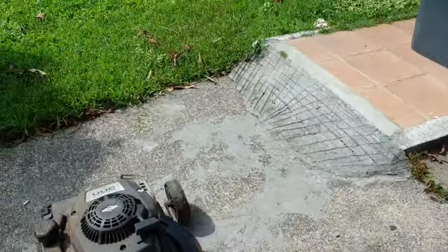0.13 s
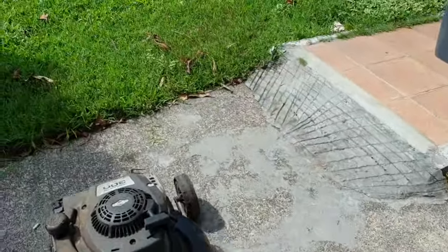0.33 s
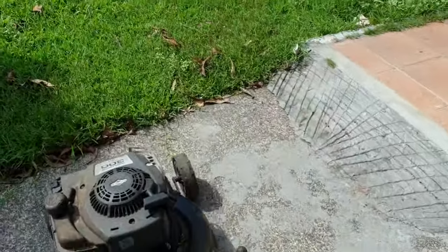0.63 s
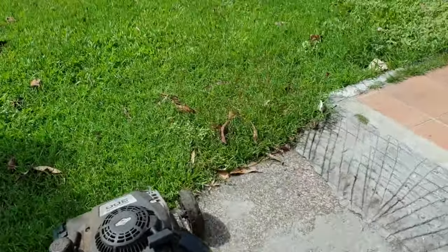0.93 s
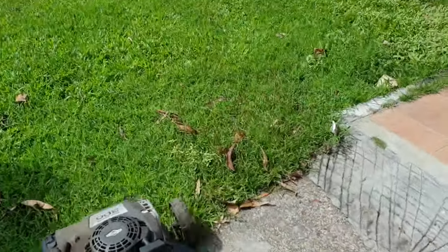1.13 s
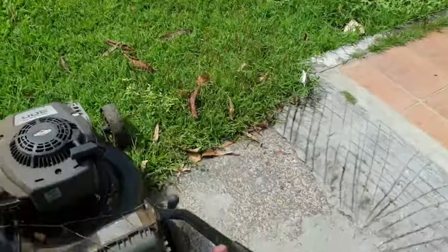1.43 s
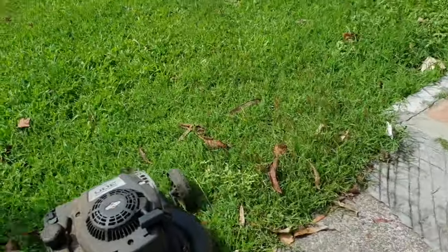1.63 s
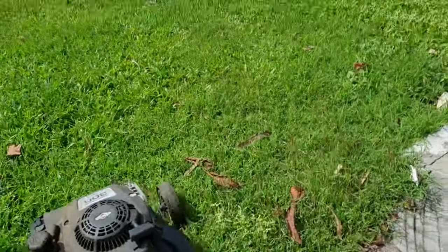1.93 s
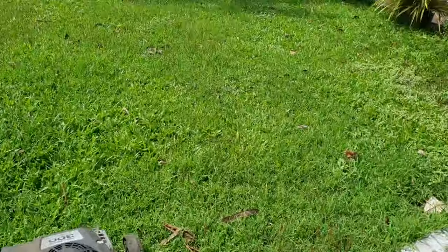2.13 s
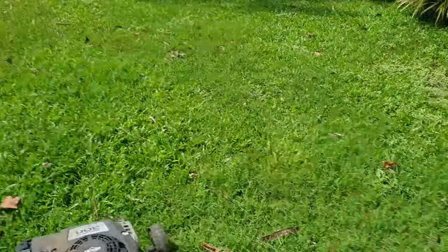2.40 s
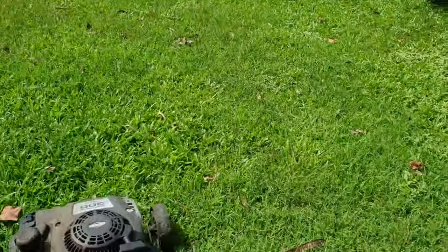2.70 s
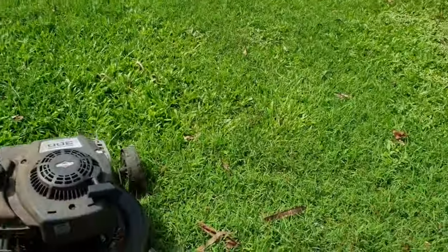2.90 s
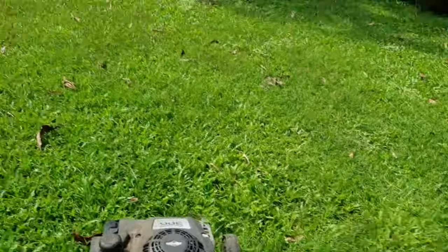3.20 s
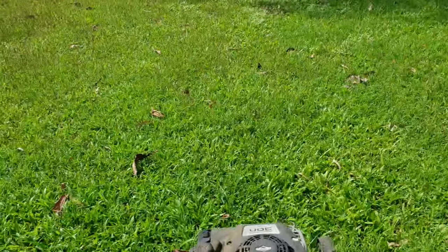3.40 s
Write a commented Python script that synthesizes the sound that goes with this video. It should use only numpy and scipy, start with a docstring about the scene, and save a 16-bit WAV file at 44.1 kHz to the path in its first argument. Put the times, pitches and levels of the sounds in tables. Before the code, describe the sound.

A switched-off lawn mower rattles loudly over rough concrete, then rolls quietly onto grass

```python
"""A rattling steel rumble opens: a switched-off walk-behind mower is pushed over rough concrete, then onto a lawn.
Hard wheels drive the resonances of the steel deck with random bumps; grit scrapes and loose steel buzzes.
Single jolts boom and knock in the deck, loose parts crack, ring and ping, and bumps thud in the ground.
Grass brushes the deck as flickering filtered noise and dry bits snap; two ports hear it in stereo.
The loudest peaks saturate."""
import sys
import numpy as np
from scipy.fft import rfft, irfft, next_fast_len
from scipy.io import wavfile
from scipy.ndimage import map_coordinates

SR = 44100
rng = np.random.default_rng(int(sys.argv[2]) if len(sys.argv) > 2 else 0)


def unload_audio(sound):
    """Save the sound as a 16-bit wav file, at the path given as the first command line argument."""
    columns = np.transpose(np.atleast_2d(sound))
    # keep every value between -1 and 1, then stretch to whole-number steps
    steps = np.round(np.clip(columns, -1, 1) * 32767)
    wavfile.write(sys.argv[1], SR, steps.astype(np.int16))


N = 156555  # samples

# Resonances of the steel deck: f/Hz, width/Hz, level/dB
DECK_MODES = [(237.4, 41.5, 2.5), (297.6, 26.5, 2), (333, 61.7, -4), (481, 165, -9.5), (647, 68.4, -7),
              (778, 59, -12), (919, 35, -14), (1256, 84, -22)]
# Resonances of the ground: f/Hz, width/Hz, level/dB
GROUND_MODES = [(56, 64, -5.5), (93, 52.4, -2)]
# Resonances of the loose steel: f/Hz, width/Hz, level/dB
LOOSE_MODES = [(2032, 88, 8.5), (3360, 120, -6)]
# Relative spectrum of a sharp crack: f/Hz, density/dB per Hz
CRACK_SPECTRUM = [(900, -12.5), (2500, -13), (3680, -7.5), (5340, -3), (7740, -6.5), (10000, 2),
                  (15800, -5.5)]

BUMP_HZ = 1430  # corner above which the push of a bump on the deck weakens
GRIT_SPREAD_DB = 4  # unevenness of grit impacts
DETUNE = 0.02  # relative random shift of resonances from blow to blow


def amp(db):
    """Convert a level in dB to an amplitude ratio."""
    return 10 ** (np.asarray(db) / 20)


def unit(x):
    """Normalise a signal to an rms of 1."""
    return x / np.sqrt(np.mean(x ** 2) + 1e-20)


def along(points, hz):
    """Interpolate (f/Hz, value) points on a logarithmic frequency axis."""
    f, value = np.transpose(points)
    return np.interp(np.log(hz + 1), np.log(f + 1), value)


def curves(rows):
    """Interpolate each column after the time linearly, one value per sample."""
    s, *columns = np.transpose(rows)
    return [np.interp(np.arange(N) / SR, s, column) for column in columns]


def wobble(rate):
    """Band-limited random modulation: a cubic spline through `rate` normal random knots a second."""
    knots = rng.standard_normal(int(N * rate / SR) + 4)
    return map_coordinates(knots, [np.arange(N) * rate / SR])


def filtered(x, response):
    """Linear filtering: the spectrum of x times a complex response of frequency."""
    m = next_fast_len(N + SR // 2)
    hz = np.fft.rfftfreq(m, 1 / SR)
    return irfft(rfft(x, m) * response(hz), m)[..., :N]


def body(modes):
    """Modal superposition: damped resonances added with alternating sign."""
    def response(f):
        total = 0
        for k, (centre, width, db) in enumerate(modes):
            damping = 1j * f * width
            total = total + (-1) ** k * amp(db) * damping / (centre ** 2 - f ** 2 + damping)
        return total
    return response


def colour(spectrum):
    """Zero-phase response that gives noise a smooth spectrum."""
    return lambda f: amp(along(spectrum, f))


def grains(per_s, spread_db):
    """Shot noise: two unrelated random trains of tiny impacts of uneven size, at rms 1."""
    size = amp(spread_db * rng.exponential(size=(2, N))) * rng.standard_normal((2, N))
    struck = rng.random((2, N)) < per_s / SR
    return unit(size * struck)


def shaped(force, response):
    """Source-filter principle: force through a response scaled to unit power gain on white noise."""
    power_gain = np.mean(np.abs(response(np.fft.rfftfreq(N, 1 / SR))) ** 2)
    return filtered(force, response) / np.sqrt(power_gain)


def blows(starts_s, peaks_db, length_s, response, tail_share, tail_s, detune=0):
    """Impact excitation: short noisy bursts with a tail drive a response varied from blow to blow."""
    size, lead = 16384, 1024  # samples; the lead leaves room for zero-phase filters to spread backwards
    tint_db, tint_hz = 4, 1500  # random tint of the spectrum, growing around tint_hz
    lump_db, lumps_per_s = 4, 500  # random steps in the force
    out = np.zeros((2, N + 2 * size))
    t = np.maximum(np.arange(size) - lead, 0) / SR
    hz = np.fft.rfftfreq(size, 1 / SR)
    half_octaves = 2 * np.log2(hz + 20)
    for s, db in zip(starts_s, peaks_db):
        tilt = map_coordinates(rng.standard_normal(32), [half_octaves])
        tint = amp(tint_db * hz / (hz + tint_hz) * tilt)
        gain = response(hz * (1 + detune * rng.standard_normal()))
        u = t / length_s
        attack = 1 - np.exp(-3 * u)
        decay = np.exp(-u * u) + tail_share * np.exp(-t / tail_s)
        lumps = amp(lump_db * rng.standard_normal(size)[(t * lumps_per_s).astype(int)])
        force = attack * decay * lumps * rng.laplace(size=(2, size))
        sound = irfft(rfft(force) * gain * tint, size)
        peak = np.abs(sound).max(axis=1, keepdims=True)
        start = round(s * SR)
        out[:, start:start + size] += amp(db) * sound / peak
    return out[:, lead:lead + N]


def thuds():
    """Impulse response of soft ground: bumps excite a low, heavily damped resonance."""
    # Bumps in the lawn: t/s, peak level/dB
    thud_rows = [(0.38, -13), (1.562, -13), (1.751, -8), (2.885, -11), (3.058, -10), (3.195, -15.5)]
    softness = 0.85  # thuds sit lower than the rolling rumble by this frequency ratio
    ground = lambda f: body(GROUND_MODES[1:])(f / softness) ** 2
    return blows(*np.transpose(thud_rows), 0.023, ground, 0, 1)


def grass():
    """Friction noise: blades brush the deck as a grainy hiss over a coarser rustle; dry bits snap."""
    # Brushing: t/s, fine hiss level/dB, coarse rustle level/dB
    swish = [(0, -30.5, -39), (.3, -35, -40.5), (.6, -31, -41), (1.035, -43, -37), (1.05, -16, -23.5),
             (1.15, -27, -33), (1.55, -27.5, -32.5), (1.68, -22, -31.5), (1.9, -23.5, -35.5),
             (1.96, -32, -39), (2.3, -27.5, -36), (2.48, -27, -31), (2.6, -29.5, -37.5), (2.82, -22.5, -30),
             (2.98, -36.5, -47.5), (3.55, -33.5, -50.5)]
    # Relative spectrum of the fine hiss: f/Hz, density/dB per Hz
    hiss_spectrum = [(5500, -15.5), (7800, -8.5), (9500, 0.5), (15800, -5.5)]
    # Relative spectrum of the coarse rustle: f/Hz, density/dB per Hz
    rustle_spectrum = [(1500, -38), (2500, -6.5), (5500, -1), (8000, -16.5)]
    # Dry stalks and leaves: t/s, peak level/dB
    snap_rows = [(0.4627, -4), (1.2678, 0.5), (1.8, -5.5), (1.917, -10), (2.143, 4.5), (2.7808, -1),
                 (2.7957, -3), (2.814, 3.5), (2.835, 6), (2.864, -5), (3.156, -14), (3.475, -9.5)]
    grain_share, clump_db, flutter_db = 0.5, 3, 2.2

    def brushing():
        clumps = amp(clump_db * wobble(25.14))
        crackle = grain_share * clumps * grains(500, 4.9)
        flutter = amp(flutter_db * wobble(39.94))
        return flutter * (rng.standard_normal((2, N)) + crackle)

    fine_db, coarse_db = curves(swish)
    hiss = amp(fine_db) * shaped(brushing(), colour(hiss_spectrum))
    rustle = amp(coarse_db) * shaped(brushing(), colour(rustle_spectrum))
    snaps = blows(*np.transpose(snap_rows), 0.0018, colour(CRACK_SPECTRUM), 0.29, 0.0069)
    return hiss + rustle + snaps


def rattles():
    """Struck resonators: loose parts hit the deck with a bright crack and steel ring, at times a thin ping."""
    # Hits of loose parts: t/s, crack peak level/dB, ring peak level/dB
    hits = [(0.0978, 7.5, -7), (0.18, 4, -1), (0.257, -8, -13.5), (0.3671, 3, -8), (0.4899, 0.5, -12.5),
            (0.5269, -1, -8.5), (0.5604, 4.5, -7.5), (0.6078, -6.5, -3.5), (0.633, 0, -7.5),
            (0.7402, 4, -5.5), (0.8705, -7.5, -10), (0.893, 4.5, -3.5), (0.9656, -4, -25),
            (0.9961, -19, -4.5), (1.041, 1.5, -6.5), (1.0888, -5, -17), (1.1069, 5, -2), (1.283, 2, -8),
            (1.5748, 1, -11.5)]
    # Pings of a small steel part: t/s, peak level/dB
    ping_rows = [(1.0915, -6.5), (1.246, -14), (1.576, -3.5), (1.718, -16)]
    # Resonance of that part: f/Hz, width/Hz, level/dB
    ping_modes = [(7183, 235, 0)]
    s, crack_db, ring_db = np.transpose(hits)
    crack = blows(s, crack_db, 0.0065, colour(CRACK_SPECTRUM), 0.57, 0.015)
    ring = blows(s, ring_db, 0.0035, body(LOOSE_MODES), 0.99, 0.011, DETUNE)
    ping = blows(*np.transpose(ping_rows), 0.0066, lambda f: body(ping_modes)(f) ** 2, 0.2, 0.018)
    return crack + ring + ping


def jolts():
    """Modal excitation by impact: each jolt knocks the panels and booms in the lowest deck modes."""
    # Jolts: t/s, boom of the whole deck peak level/dB, knock of its panels peak level/dB
    jolt_rows = [(0.131, -7, -1), (0.194, -6.5, -4), (0.263, -10.5, -11.5), (0.427, -8, -3),
                 (0.525, -7, -14), (0.607, -2.5, 3.5), (0.706, -21, -2.5), (0.799, -2, 1.5), (0.857, -8, 1),
                 (0.994, -1, 2.5), (1.122, -1, 1.5), (1.148, -9, -7.5), (1.441, -9.5, -7.5),
                 (1.552, -7, -12.5), (1.724, -5, -5.5), (1.791, -6, -16.5), (2.032, -9, -11),
                 (2.056, -7.5, -11.5), (2.228, -7.5, -7.5), (2.868, -12, -13.5), (3.052, -13, -24),
                 (3.184, -11, -10)]
    knock_lead_s = 0.00098  # the knock comes before the boom
    s, boom_db, knock_db = np.transpose(jolt_rows)
    whole_deck = lambda f: body(DECK_MODES[:3])(f) ** 2
    panels = lambda f: body(DECK_MODES[3:])(f) / (1 + 1j * f / BUMP_HZ) ** 2
    boom = blows(s, boom_db, 0.0088, whole_deck, 0.26, 0.032)
    knock = blows(s - knock_lead_s, knock_db, 0.008, panels, 0.52, 0.017, DETUNE)
    return boom + knock


def rolling():
    """Roughness excitation: wheels drive deck and ground with random bumps; grit scrapes, loose steel buzzes."""
    # Rolling: t/s, deck level/dB, ground level/dB, grit level/dB
    roll = [(0, -15, -26, -30.5), (.3, -15.5, -15.5, -28.5), (.55, -9, -16, -22.5), (.75, -4, -11, -19.5),
            (1.14, -7.5, -14.5, -12), (1.2, -16, -18, -28), (1.5, -15, -29.5, -25.5),
            (1.85, -25.5, -27, -27), (1.97, -38.5, -29, -38), (2.45, -32, -32, -33.5),
            (2.85, -35, -33, -34), (3.0, -39, -32, -43), (3.55, -35.5, -33.5, -44)]
    # Relative spectrum of scraping grit: f/Hz, density/dB per Hz
    grit_spectrum = [(400, 3.5), (900, 3.5), (2040, 0), (4000, -21.5), (8000, -60)]
    smooth_db, rough_db = -24, -6.5  # deck levels of rolling on grass and on concrete
    bumps_per_s, bump_spread_db = 450, 2.5
    buzz_db, tick_db = -25, -11.5  # loose steel buzzing and ticking, relative to the grit

    deck_db, ground_db, grit_db = curves(roll)
    rough = np.clip((deck_db - smooth_db) / (rough_db - smooth_db), 0, 1)
    shake_db = 2.6 * rough * wobble(18.2)

    def contact(lumps):
        # Power crossfade from smooth noise on grass to lumpy impacts on concrete.
        return np.sqrt(rough) * lumps + np.sqrt(1 - rough) * rng.standard_normal((2, N))

    bumps = contact(grains(bumps_per_s, bump_spread_db))
    soft_deck = lambda f: body(DECK_MODES)(f) / (1 + 1j * f / BUMP_HZ)
    deck = shaped(amp(deck_db + shake_db) * bumps, soft_deck)

    rumble = amp(ground_db + 0.28 * wobble(10)) * rng.standard_normal((2, N))
    ground = shaped(rumble, body(GROUND_MODES))

    scrape_db = grit_db + shake_db + 4.8 * wobble(29.35)
    scrape = amp(scrape_db) * contact(grains(700, GRIT_SPREAD_DB))
    grit = shaped(scrape, colour(grit_spectrum))
    buzz = amp(buzz_db) * shaped(scrape, body(LOOSE_MODES[:1]))
    tick_force = amp(grit_db + tick_db) * rough * grains(62, GRIT_SPREAD_DB)
    ticks = shaped(tick_force, colour(CRACK_SPECTRUM))
    return deck + ground + grit + buzz + ticks


def scene():
    """Interchannel coherence: two ports alike in the bass, the left a little earlier and quieter."""
    # Left-right likeness: f/Hz, correlation
    likeness = [(40, 0.69), (290, 0.96), (1500, 0.65), (5000, 0.13), (12000, 0.048)]
    left_db, left_lead_s = -1.55, 1e-4  # left relative to right

    def spread(f):
        # Mid and side gains whose power difference is the correlation.
        angle = np.arccos(np.clip(along(likeness, f), -1, 1)) / 2
        return np.array([np.cos(angle), np.sin(angle)])

    def lead(f):
        # Half the lead as an advance on the left, half as a delay on the right.
        return np.exp(1j * np.pi * f * left_lead_s * np.array([[1], [-1]]))

    sources = thuds() + grass() + rattles() + jolts() + rolling()
    mid, side = filtered(sources, spread)
    ports = np.array([mid + side, mid - side]) * amp([[left_db / 2], [-left_db / 2]])
    return filtered(ports, lead)


def record(dry):
    """Amplitude saturation: peaks bend towards a ceiling, then a low-pass limits the band."""
    ceiling, hardness, top_hz = 1.0, 6, 15800
    clipped = dry / (1 + np.abs(dry / ceiling) ** hardness) ** (1 / hardness)
    return np.clip(filtered(clipped, lambda f: f < top_hz), -1, 1)


dry = scene()
out = record(dry)
unload_audio(out)
```